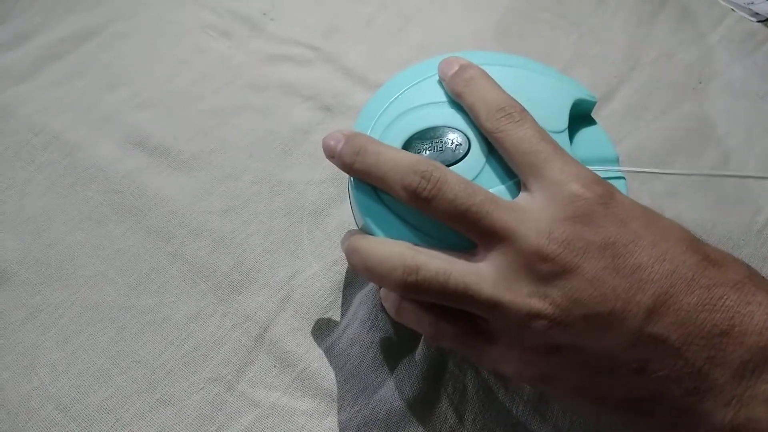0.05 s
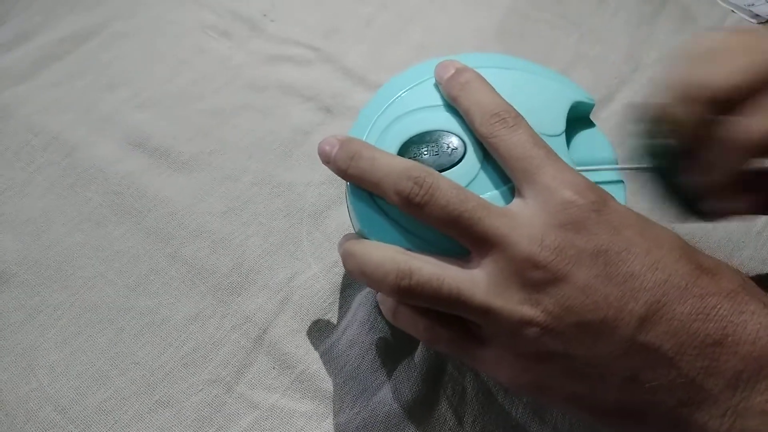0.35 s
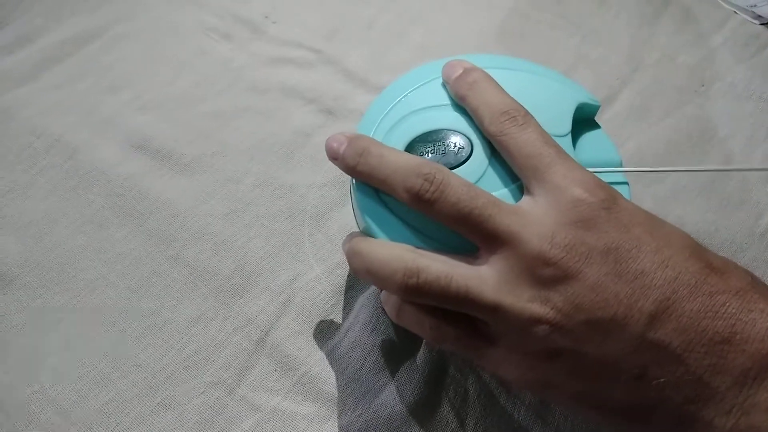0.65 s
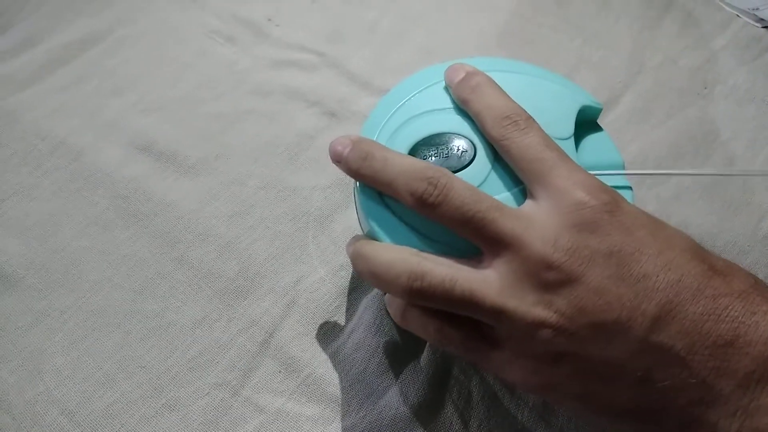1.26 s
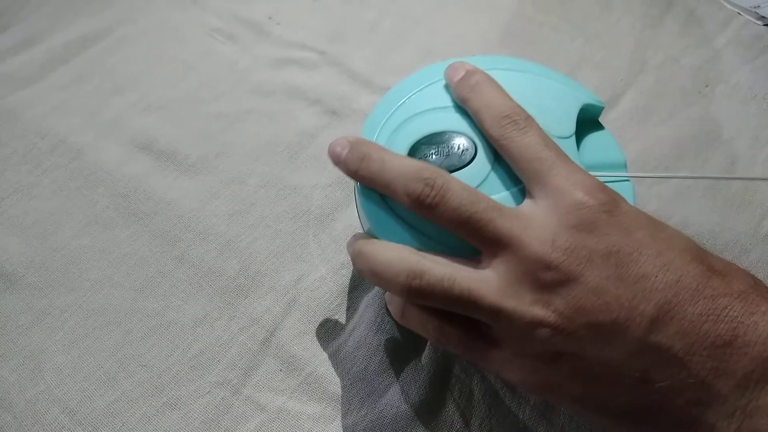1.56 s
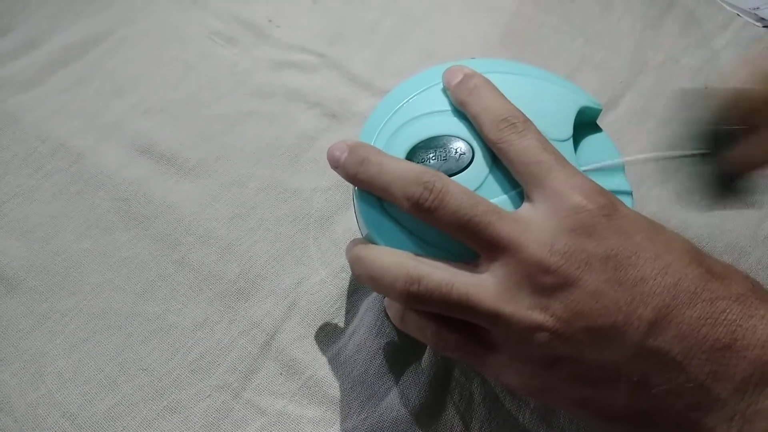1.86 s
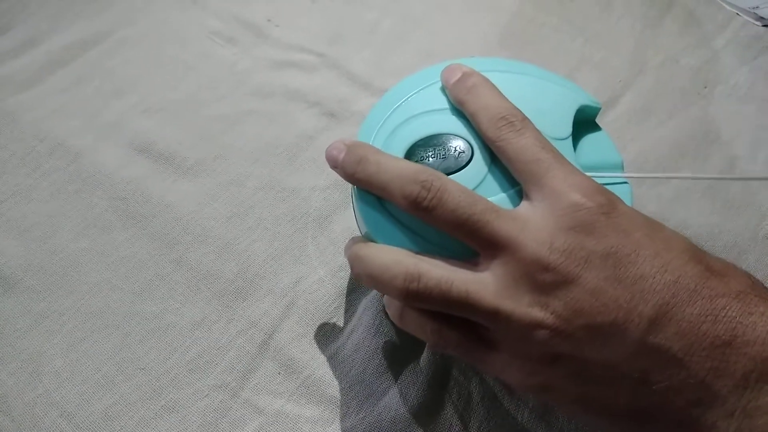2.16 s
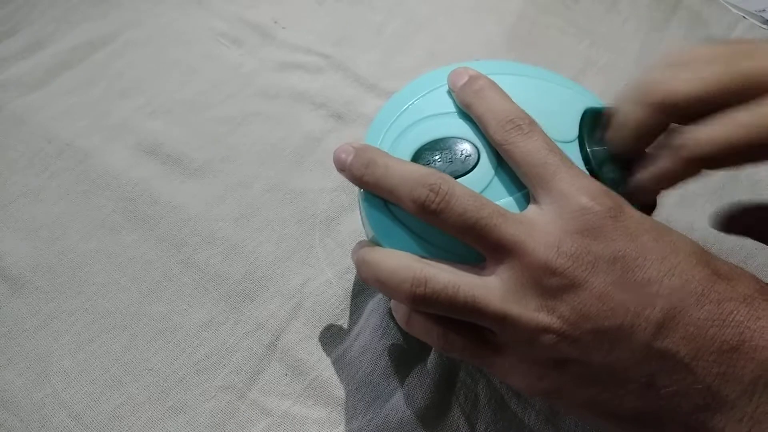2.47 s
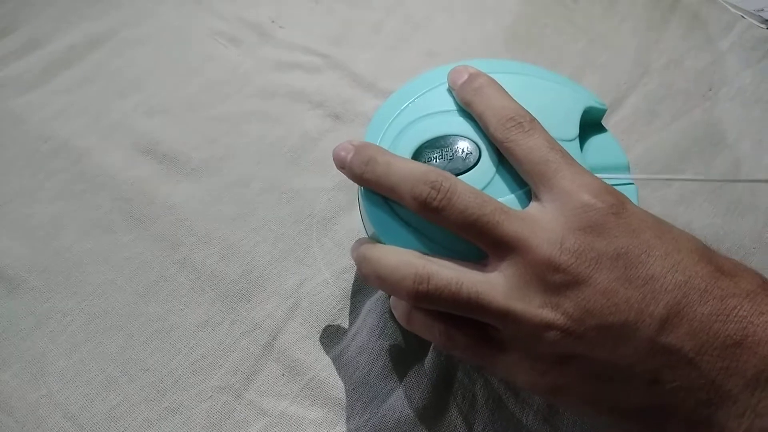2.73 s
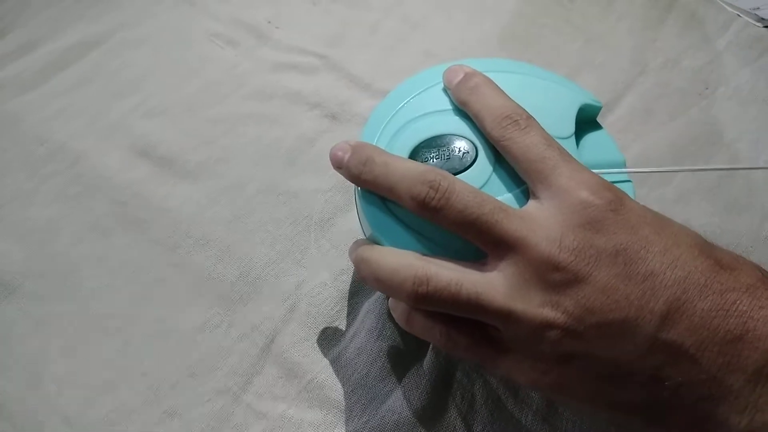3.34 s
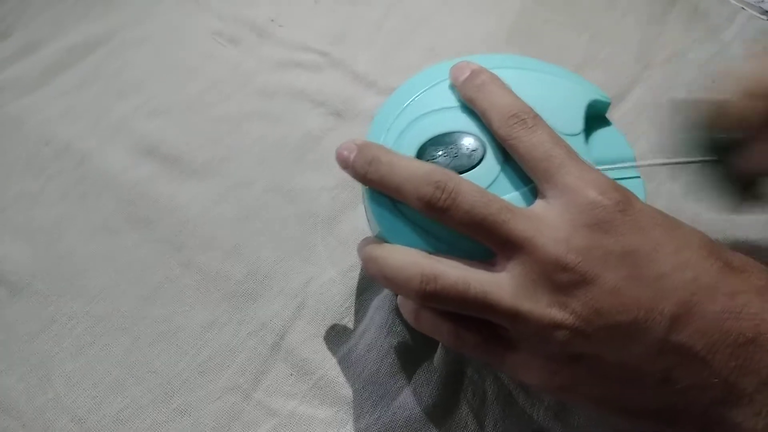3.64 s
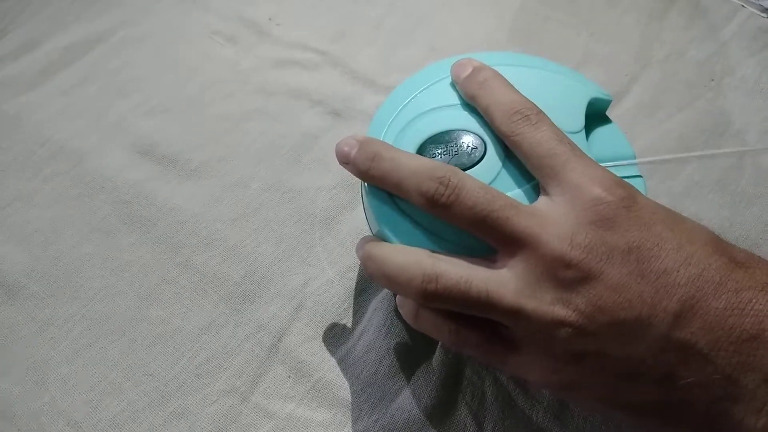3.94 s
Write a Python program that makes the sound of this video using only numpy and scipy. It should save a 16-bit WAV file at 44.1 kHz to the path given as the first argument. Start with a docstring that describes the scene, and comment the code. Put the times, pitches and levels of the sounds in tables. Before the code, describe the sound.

A pull-cord food chopper, close by, starts mid-pull and repeats about twice a second for four seconds. New pulls begin with a clack near 0.4, 0.9, 1.5, 2.0, 2.6, 3.1 and 3.6 seconds, the cord rasping while blades knock food around the plastic bowl. Between pulls the cord scuffs back with a ratcheting whir. The handle clicks near 0.9, 2.5 (loudest) and 3.6 seconds. A faint room hum lies underneath.

```python
"""A cord rasps and blades knock food round a plastic bowl: a pull-cord chopper, already in mid-pull.
It is worked on a cloth, close to the microphone, about twice a second, over a faint room hum.
After each pull a spring winds the cord back: the ratchet whirs and the cord scuffs in its guide.
The clutch catches with a double clack as the next pull begins; sometimes the handle clicks home first."""
import sys
import numpy as np
from scipy import signal
from scipy.fft import rfft, irfft
from scipy.io import wavfile

SR = 44100
rng = np.random.default_rng(int(sys.argv[2]) if len(sys.argv) > 2 else 0)


def transcribe(signal):
    """Save signal, clipped to [-1, 1], as a 16-bit WAV file at the path in sys.argv[1]."""
    frames = np.atleast_2d(signal).T
    limited = np.clip(frames, -1, 1)
    pcm = np.round(limited * 32767).astype(np.int16)
    wavfile.write(sys.argv[1], SR, pcm)


N = 176400
T = np.arange(N) / SR


def from_db(db):
    """Decibels to gain."""
    return 10 ** (np.asarray(db) / 20)


def unit_rms(x):
    """Scale to rms 1."""
    return x / np.sqrt(np.mean(x ** 2) + 1e-20)


def wander(hz):
    """Smooth random drift up to the given speed; rms 1."""
    return unit_rms(signal.sosfilt(signal.butter(2, hz, fs=SR, output="sos"), rng.standard_normal(N)))


def clicks(times, heights):
    """Single-sample pushes at the given times."""
    out = np.zeros(N)
    np.add.at(out, np.clip(times * SR, 0, N - 1).astype(int), heights)
    return out


def grains(per_s=5000, spread_db=1):
    """Friction texture: random tiny contacts of uneven size; rms 1."""
    sizes = from_db(spread_db * np.clip(rng.standard_normal(N), -2, 2)) * rng.choice([-1, 1], N)
    return unit_rms(sizes * (rng.random(N) < per_s / SR))


def envelope(start, end, shares, db, release_s=.014):
    """Gain over one movement, dying away after its end."""
    shape = from_db(np.interp((T - start) / (end - start), shares, db))
    return shape * (T >= start) * np.exp(-np.maximum(T - end, 0) / release_s)


def through(x, response):
    """Pass one or two channels through an impulse response."""
    return signal.oaconvolve(np.atleast_2d(x), response[None], axes=1)[:, :N]


def impulse_response(eq, size=4096):
    """Minimum-phase response of an EQ curve."""
    hz, db = np.transpose(eq)
    gain = from_db(np.interp(np.log(np.linspace(1, SR / 2, size // 2 + 1)), np.log(hz), db))
    cepstrum = irfft(np.log(gain))
    cepstrum[1:size // 2] *= 2
    cepstrum[size // 2 + 1:] = 0
    return irfft(np.exp(rfft(cepstrum)))


def noise_tail(x, decay_s):
    """Fresh stereo noise that follows the power of x and dies away."""
    keep = np.exp(-1 / (decay_s * SR))
    power = signal.lfilter([1 - keep], [1, -keep], x ** 2 + 1e-18)
    return np.sqrt(power) * rng.standard_normal((2, N))


def at_ports(x, split_hz=1330, scatter_share=.62):
    """Both microphone ports share the bass; housing and hand scatter the treble; the room adds a tail."""
    low, high = (signal.butter(1, split_hz, kind, fs=SR) for kind in ("low", "high"))
    direct = signal.lfilter(*low, x) + np.sqrt(1 - scatter_share) * signal.lfilter(*high, x)
    scattered = np.sqrt(scatter_share) * signal.lfilter(*high, noise_tail(x, decay_s=.0013))
    return direct + scattered + from_db(-17) * noise_tail(x, decay_s=.038)


def coloured(x, eq):
    """Spread a white signal to both ports and shape it with a unit-power EQ."""
    response = impulse_response(eq)
    return through(at_ports(x), response / np.linalg.norm(response))


def struck(hits, eq):
    """Hard contacts on a well-damped plastic part."""
    times, db = np.transpose(hits)
    response = impulse_response(eq)
    return through(at_ports(clicks(times, from_db(db))), response / np.abs(response).max())


# The hand's rhythm. Each row: pull start in seconds, rewind start in seconds, chopping level in dB.
STROKES = [(-.19, 0.116, -25.5), (0.364, 0.671, -31), (0.913, 1.201, -24), (1.452, 1.752, -24.5),
           (1.997, 2.293, -25), (2.561, 2.848, -26), (3.098, 3.378, -24.5), (3.631, 3.915, -28.5)]
# The shape of one pull. Each row: share of the pull, rasp gain in dB, chopping gain in dB.
PULL_SHAPE = [(0, -4.5, 0), (.1, -5.5, -11), (.22, 1.5, -11), (.45, 1, 1.5), (.66, -1, 0), (.82, -14, -5.5),
              (1, -18, -14.5)]
# The cord's dry, mid-heavy tone. Each row: frequency in Hz, relative gain in dB.
RASP_EQ = [(150, -17), (290, -15), (508, -2), (854, -7.5), (1100, -10), (2290, -7.5), (3100, -10.5),
           (4700, -11), (5000, -18.5), (6500, -22), (7340, -17.5), (9260, -23.5), (10900, -21),
           (12900, -32), (14300, -37)]
def cord_rasp(level_db=-30, zing_db=-8, zing_hz=3130, drift_hz=190):
    """The cord drags through its guide in dense, tiny slips; at full tension it zings, drifting in pitch."""
    shares, rasp_db, _ = np.transpose(PULL_SHAPE)
    effort = sum(envelope(start, turn, shares, rasp_db) for start, turn, _ in STROKES)
    pitch = zing_hz + drift_hz * wander(hz=30)
    flutter = np.array([wander(hz=45), wander(hz=45)])
    zing = flutter * np.sin(2 * np.pi * np.cumsum(pitch) / SR)
    rasp = coloured(effort * grains(), RASP_EQ)
    return from_db(level_db) * (rasp + from_db(zing_db) * effort ** 2 * zing)


# Accents where the blades hit big pieces. Each row: start in seconds, level in dB.
BIG_CHOPS = [(.003, -14.5), (.058, -12), (.086, -15), (.439, -11.5), (.548, -12), (.964, -11), (1.01, -9.5),
             (1.034, -8.5), (1.071, -14), (1.083, -10), (1.112, -11), (1.565, -14), (1.574, -27),
             (1.607, -12.5), (1.616, -8.5), (1.641, -12), (2.079, -11), (2.124, -11.5), (2.154, -24),
             (2.663, -15), (2.709, -15), (2.747, -8.5), (2.758, -8.5), (3.168, -9.5), (3.311, -13.5),
             (3.736, -12), (3.764, -14), (3.783, -10.5), (3.793, -13), (3.839, -18)]
# The ring of bowl and lid. Each row: frequency in Hz, relative level in dB, seconds to fall 60 dB.
BOWL_MODES = [(413, -10, 0.065), (476.4, -9, 0.11), (600, 0.5, 0.024), (807, -1, 0.032), (915, -2, 0.034),
              (1355, 0, 0.014), (1762, -3.5, 0.026), (2234, -3, 0.0098), (2555, 8.5, 0.004),
              (3190, -2, 0.022), (3700, -3, 0.011), (4550, -18.5, 0.11)]
def chopping(median_knocks_per_s=170, knock_spread_db=2.5, mode_spread_db=4, jolt_db=-10.5):
    """Blades and food knock unevenly on the bowl; each knock rings the modes in its own way."""
    shares, _, chop_db = np.transpose(PULL_SHAPE)
    load = sum(from_db(db) * envelope(start, turn, shares, chop_db) for start, turn, db in STROKES)
    t = T[:SR // 10]
    rings = np.array([from_db(db - 60 * t / t60) * np.sin(2 * np.pi * hz * t)
                      for hz, db, t60 in BOWL_MODES])
    gap_draws, size_draws = rng.standard_normal((1500, 2)).T
    times = np.cumsum(np.exp(.5 * gap_draws)) / median_knocks_per_s
    sizes = from_db(knock_spread_db * np.clip(size_draws, -2, 1)) * (times < T[-1])
    patter = load * unit_rms(clicks(times, sizes)) / np.linalg.norm(rings)
    jolts = [(start, db + jolt_db) for start, db in CLUTCH_CATCHES]  # the clutch jolts the bowl too
    accent_times, accent_db = np.transpose(BIG_CHOPS + jolts)
    accents = clicks(accent_times, from_db(accent_db)) / np.linalg.norm(rings, axis=0).max()
    knocks = patter + accents
    strengths = from_db(mode_spread_db * rng.standard_normal((len(BOWL_MODES), N)))
    strengths *= rng.choice([-1, 1], strengths.shape) / np.sqrt(np.mean(strengths ** 2, axis=0))
    hardness = np.sqrt(np.minimum(2 * load / load.max(), 1))  # slow blades leave the upper modes quiet
    strengths[[hz > 1200 for hz, _, _ in BOWL_MODES]] *= hardness
    bowl = sum(through(at_ports(knocks * strength), ring) for strength, ring in zip(strengths, rings))
    bowl = signal.sosfilt(signal.butter(2, 340, "high", fs=SR, output="sos"), bowl)
    return signal.sosfilt(signal.butter(6, 4800, "low", fs=SR, output="sos"), bowl)


# Brief swells of the hum. Each row: centre in seconds, level in dB.
HUM_SWELLS = [(.32, -42), (.55, -39.5), (2.26, -38), (3.76, -39.5), (3.97, -37.5)]
# The room's soft noise bed. Each row: frequency in Hz, relative gain in dB.
ROOM_EQ = [(30, -31), (100, -3), (160, 1), (480, -6.5), (4500, -11.5), (6000, -21), (14000, -34)]
def room_tone(noise_db=-46.5, hum_db=-53, hum_hz=68.6, swell_width_s=.032):
    """Quiet room noise and a low hum that wavers and swells now and then."""
    band = signal.butter(2, [hum_hz - 4, hum_hz + 4], "band", fs=SR, output="sos")
    hum = from_db(hum_db) * unit_rms(signal.sosfilt(band, rng.standard_normal(N + SR))[SR:])
    swell = sum(from_db(db) * np.exp(-.5 * ((T - centre) / swell_width_s) ** 2)
                for centre, db in HUM_SWELLS)
    hum += swell * np.sin(2 * np.pi * hum_hz * T)
    return hum + from_db(noise_db) * coloured(rng.standard_normal(N), ROOM_EQ)


# The shape of one rewind. Each row: share of the rewind, gain in dB.
REWIND_SHAPE = [(0, 1.5), (.2, 5), (.42, 2.5), (.58, -2.5), (.78, -5), (1, -62)]
# The pawl's thin, bright ring. Each row: frequency in Hz, gain in dB.
PAWL_MODES = [(8380, -12), (10130, -4), (10470, -9), (12350, -16)]
# The tone of the whir. Each row: frequency in Hz, relative gain in dB.
REWIND_EQ = [(100, -12.5), (300, -8), (450, 2), (780, -10), (1100, -6.5), (1340, 2.5), (1550, -4.5),
             (1850, -1.5), (2500, -10), (3600, -3.5), (4730, -5.5), (5000, -14.5), (6500, -16.5),
             (8600, -8), (9500, -16.5), (10400, -9), (11300, -20.5), (14200, -23)]
def rewind(level_db=-32.5, length_s=.255, slow_hz=69.9, fast_hz=115.9, tick_decay_s=.0027):
    """Ratchet teeth tick and ring the pawl, fastest in mid-travel, while spring and cord slide."""
    shares, shape_db = np.transpose(REWIND_SHAPE)
    wobble = np.exp(.12 * wander(hz=30))
    teeth, slide = np.zeros((2, N))
    for _, start, _ in STROKES:
        speed = np.sin(np.pi * np.clip((T - start) / length_s, 0, 1))
        tooth_rate = (slow_hz + (fast_hz - slow_hz) * speed) * wobble
        teeth_passed = np.ceil(np.cumsum(tooth_rate * (T >= start)) / SR)
        level = from_db(level_db) * envelope(start, start + length_s, shares, shape_db)
        teeth += level * np.diff(teeth_passed, prepend=0)
        slide += level * speed
    teeth *= from_db(2.5 * rng.standard_normal(N))  # no two ticks are equally loud
    t = T[:SR // 20]
    fade = np.exp(-t / tick_decay_s)
    modes = [from_db(db) * fade * np.sin(2 * np.pi * hz * t) for hz, db in PAWL_MODES]
    pawl = sum(through(teeth * rng.choice([-1, 1], (2, N)), mode) for mode in modes)
    ticks = 1.5 * through(teeth, np.sqrt(t / tick_decay_s) * fade)[0] * grains()
    scratch = 1.125 * slide * grains(per_s=3500, spread_db=2)
    return pawl + coloured(ticks + scratch, REWIND_EQ)


# Rubs of the slack cord. Each row: start in seconds, level in dB.
CORD_SCUFFS = [(.211, -21.5), (.277, -21.5), (.822, -24.5), (1.302, -22.5), (1.848, -20), (1.912, -26),
               (2.396, -20), (2.456, -22), (2.942, -21), (3.472, -17)]
# Their papery tone. Each row: frequency in Hz, relative gain in dB.
SCUFF_EQ = [(100, -42), (480, -4), (900, 4), (1400, 10), (3700, 3), (4700, 0), (5300, -5.5), (14000, -26)]
def cord_scuffs(attack_s=.0023):
    """The slack cord rubs its guide; each scuff bites quickly and dies away."""
    bite = np.zeros(N)
    for start, db in CORD_SCUFFS:
        age = np.maximum(T - start, 0) / attack_s
        bite += from_db(db) * age * np.exp(1 - age)
    return coloured(bite * grains(), SCUFF_EQ)


# The clutch catches and rebounds. Each row: start in seconds, level in dB.
CLUTCH_CATCHES = [(0.371, -10), (.3755, -9), (0.911, -10), (.919, -11), (1.461, -9.5), (2.001, -10.5),
                  (2.011, -6.5), (2.564, -12.5), (2.5709, -9.5), (2.574, -8.5), (3.093, -10), (3.101, -9),
                  (3.123, -13), (3.639, -5), (3.6445, -7.5)]
# The hollow body of the clack. Each row: frequency in Hz, relative gain in dB.
CLUTCH_EQ = [(100, -13.5), (300, -5), (460, 6), (830, -2), (1110, -3), (1320, 5.5), (2400, 0.5),
             (3000, -11.5), (4600, -14), (5100, -22), (10400, -19.5), (14500, -38)]
def clutch(grind_db=-2, grind_s=.0024, crack_db=-6, crack_hz=2200, crack_width_hz=270):
    """Each catch is a clack with a brief grind; the hardest ones also make the spool crack."""
    times, db = np.transpose(CLUTCH_CATCHES)
    body = impulse_response(CLUTCH_EQ)
    grit = noise_tail(clicks(times, from_db(db + grind_db)), grind_s)[0]
    grind = through(at_ports(grit), body / np.abs(body).max())
    t = T[:SR // 20]
    spool = from_db(crack_db) * np.exp(-np.pi * crack_width_hz * t) * np.sin(2 * np.pi * crack_hz * t)
    crack = through(clicks(times, from_db(db) ** 2), spool)  # squared, so soft catches barely crack
    return struck(CLUTCH_CATCHES, CLUTCH_EQ) + grind + crack


# The handle clicks home. Each row: start in seconds, level in dB.
HANDLE_TAPS = [(.8765, -11), (2.5135, -2), (3.566, -9)]
# The crisp tone of that click. Each row: frequency in Hz, relative gain in dB.
TAP_EQ = [(100, -17), (500, 2.5), (2700, 8), (4500, 5.5), (5500, -13), (10500, -3), (14500, -28)]
def handle_taps():
    """The returning handle taps the plastic housing."""
    return struck(HANDLE_TAPS, TAP_EQ)


# The stereo image. Each row: frequency in Hz, left minus right in dB.
PORT_BALANCE = [(390, 10), (480, 1), (900, 2.5), (1400, 1), (2400, 7.5), (3100, 5.5), (4000, 1), (8000, -3),
                (10600, 8), (13500, -2)]
def microphone(x, side):
    """Each port has its own colour; the right one (negative side) is thin in the bass."""
    port_eq = [(hz, 20 * np.log10(2 / (1 + from_db(-side * db)))) for hz, db in PORT_BALANCE]
    return through(x, impulse_response(port_eq))


def scene():
    """The chopper and the room, mixed at both ports."""
    left, right = (cord_rasp() + chopping() + room_tone() + rewind()
                   + cord_scuffs() + clutch() + handle_taps())
    return np.vstack([microphone(left, side=1), microphone(right, side=-1.01)])


def record(dry):
    """A low cut clears the rumble and a steep high cut takes off the very top."""
    low_cut = signal.butter(2, 42, "high", fs=SR, output="sos")
    high_cut = signal.ellip(10, .2, 80, 14350, fs=SR, output="sos")
    return signal.sosfilt(high_cut, signal.sosfilt(low_cut, dry))


dry = scene()
out = record(dry)
transcribe(out)
```